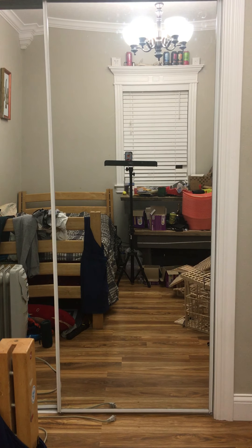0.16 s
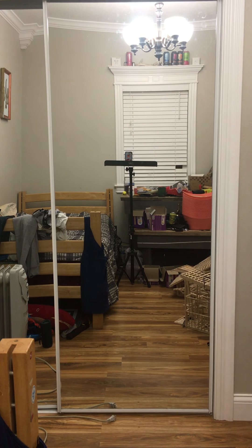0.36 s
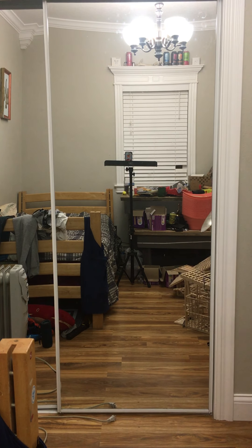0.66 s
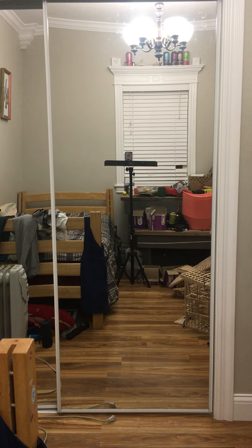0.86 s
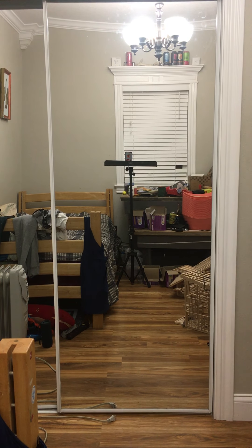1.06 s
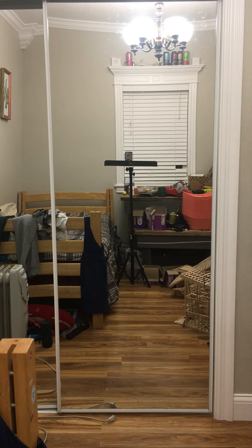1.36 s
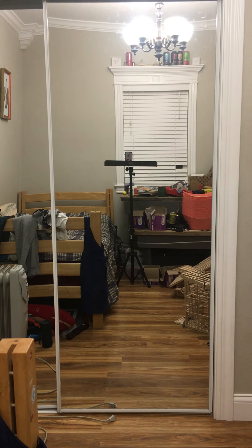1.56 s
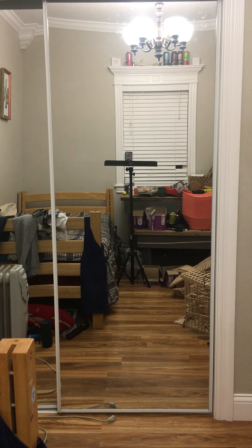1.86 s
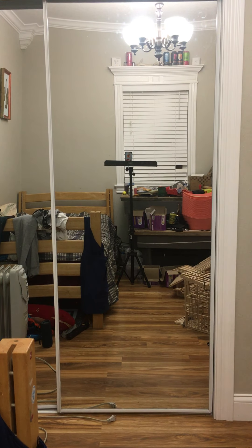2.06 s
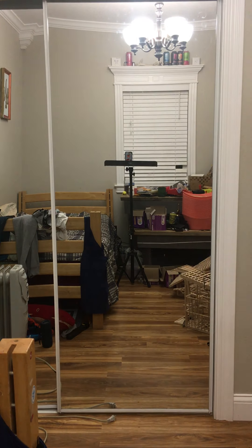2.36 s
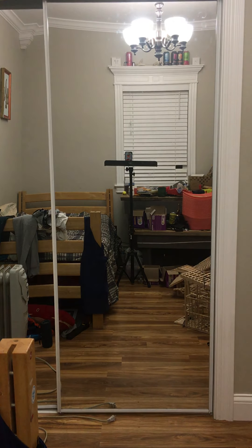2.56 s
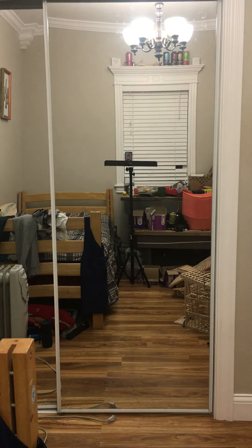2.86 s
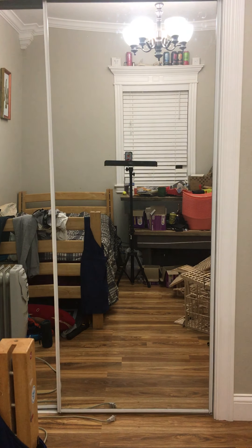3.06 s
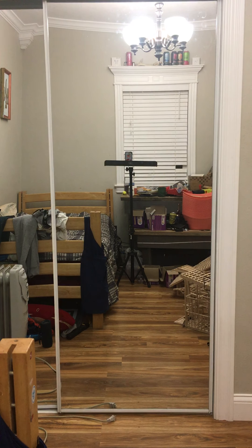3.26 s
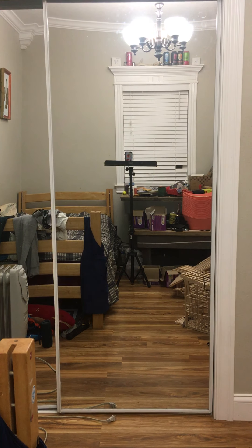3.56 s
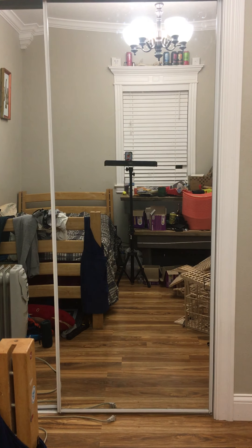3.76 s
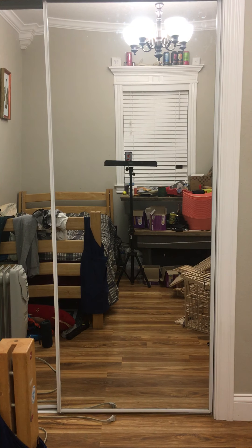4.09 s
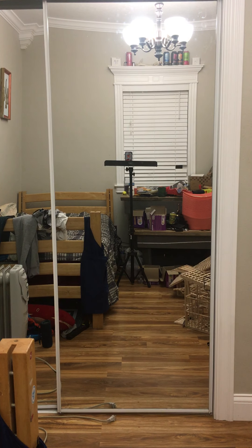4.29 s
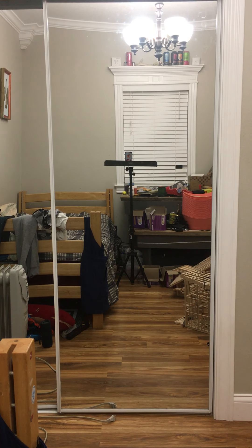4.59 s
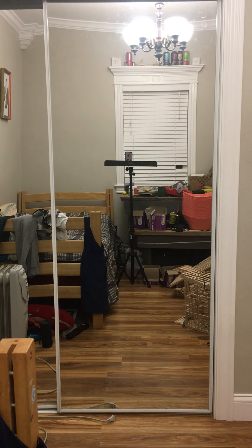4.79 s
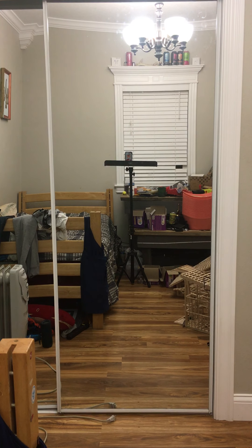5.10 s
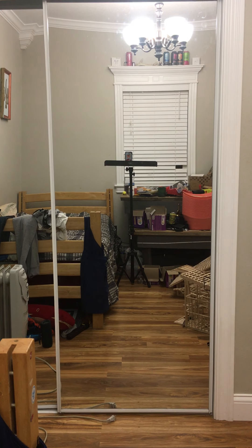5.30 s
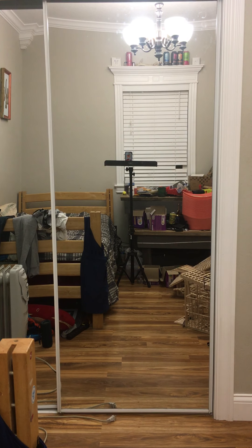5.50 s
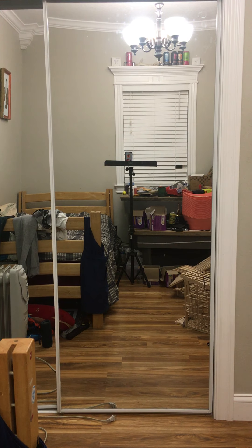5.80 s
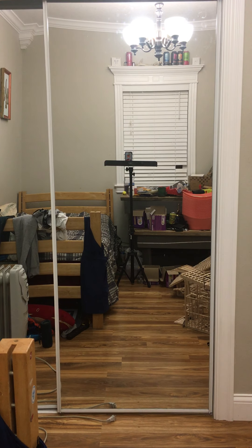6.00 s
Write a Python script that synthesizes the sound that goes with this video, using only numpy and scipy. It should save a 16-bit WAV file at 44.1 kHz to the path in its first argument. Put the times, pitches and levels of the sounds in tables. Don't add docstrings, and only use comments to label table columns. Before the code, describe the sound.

In a small, quiet bedroom with a hardwood floor, someone out of sight shuffles about, with hard knocks, dull footfalls and cloth rustle. Movement thins out over a faint low hum, broken by one sharp clack. Later a sharp knock precedes a very loud, heavy thump that shakes the boards and rocks to rest. Near silence follows. A phone on a tripod picks up the floor vibrations and slight hiss.

```python
import sys
import numpy as np
from scipy import signal
from scipy.fft import rfft, irfft, next_fast_len
from scipy.io import wavfile

SR = 44100
rng = np.random.default_rng(int(sys.argv[2]) if len(sys.argv) > 2 else 0)


def waveform_to_disk(signal):
    frames = np.transpose(np.atleast_2d(signal))
    scaled = np.clip(frames, -1, 1) * 32767
    samples = np.round(scaled).astype(np.int16)
    wavfile.write(sys.argv[1], SR, samples)


def invert_db(level):
    return 10 ** (np.asarray(level, dtype=float) / 20)


N = 270855
T = np.arange(N) / SR
SIZE = next_fast_len(N)

# pitch in Hz, level in dB, time to fade by 60 dB in seconds.
BOARDS = [(89.8, -0.5, 0.11), (104.1, 4.5, 0.31), (121, 4, 0.61), (151.2, 3.5, 0.27), (168.6, 2, 0.49),
          (188, 3.5, 0.43), (211, 1, 0.24), (239, -6, 0.23), (262.3, -6, 0.41), (296, 1.5, 0.42),
          (310, 0.5, 0.34), (357, -0.5, 0.049), (420, 1, 0.19), (498, -1, 0.079), (546, -0.5, .2),
          (673, -2.5, 0.6)]
# pitch in Hz, width in Hz, level in dB.
JOISTS = [(33, 3, -3), (47.8, 5.5, 6), (61, 5.2, -8.5)]
# start in seconds, level in dB, favoured pitch in Hz.
FOOTFALLS = [(0.016, -37, 320), (.06, -40, 300), (0.386, -47, 129), (.546, -34.5, 316), (.632, -36, 310),
             (0.665, -40, 310), (.792, -48, 280), (.906, -39, 118), (0.958, -65, 113), (1.262, -43.5, 106),
             (1.33, -53.5, 89.4), (1.565, -50.5, 186), (1.637, -57, 105), (1.748, -56, 180),
             (2.3, -55, 126), (2.388, -52, 114), (2.679, -59, 175), (2.75, -47, 200), (2.838, -54, 133),
             (4.654, -55, 147), (4.798, -57, 99.3), (5.124, -55.5, 192), (5.27, -60, 110.5)]
# start in seconds, level in dB, favoured pitch in Hz, ring factor.
LOAD_DROP = [
    (3.484, -21, 94.2, 0.66),
    (3.506, -17, 174, 0.6),
    (3.549, -30, 157, 0.61),
    (3.628, -29, 88, 0.5),
    (3.679, -26.5, 190, 0.8),
    (3.778, -27.5, 121, 1),
    (3.858, -40, 124.4, .7),
    (3.993, -43, 177, 0.93),
    (4.079, -45, 176.3, 0.76),
    (4.189, -50.5, 91.5, 0.95),
]
# start in seconds, level in dB, favoured pitch in Hz, spread in octaves, ring factor.
SINGLE_TONES = [(.5, -47, 298, 0.083, .8), (.902, -46.5, 560, .12, 0.83), (1.25, -48, 300, 0.2, .8),
                (1.335, -53.5, 420, 0.36, .7), (2.238, -39.5, 175, 0.15, .75), (2.24, -47, 535, .09, .8),
                (2.75, -54, 500, .3, 1.2), (3.164, -40, 200, .4, .5), (3.177, -34, 190, 0.072, .9),
                (3.177, -32, 410, 0.091, 1.3), (3.178, -34, 500, .15, 1.2), (3.19, -34, 314, .09, .5),
                (3.18, -38.5, 107, .15, .8), (3.181, -32, 239, .09, 1.2), (3.206, -37, 270, 0.27, .55),
                (3.498, -19, 176.3, .1, .5), (3.68, -38, 380, .35, 1.), (3.775, -40.5, 300, 0.37, 1.),
                (5.26, -53.5, 238, 0.13, .8)]
# time of greatest load in seconds, level in dB.
WEIGHT_SHIFTS = [(0, -45), (.2, -51), (.6, -46.5), (.72, -42.5), (.98, -51.5), (1.2, -50), (1.36, -48.5),
                 (1.66, -53.5), (1.77, -58), (2.05, -63), (2.45, -58.5), (2.7, -48.5), (2.84, -61),
                 (3.21, -44.5), (3.33, -44.5), (3.54, -40), (3.63, -42), (3.72, -44), (3.91, -50),
                 (4.04, -51), (4.19, -54), (4.4, -66), (4.67, -57), (5.03, -75.5), (5.27, -74), (5.92, -79)]
# time of greatest load in seconds, level in dB.
BOARD_CREEPS = [(0, -53), (.1, -43.5), (.27, -54), (.65, -40.5), (.94, -52), (1.11, -60), (1.39, -58.5),
                (1.66, -74), (1.9, -67), (2.05, -56), (2.3, -49), (2.44, -54), (2.7, -52.5), (2.82, -47),
                (3.16, -49), (3.27, -42), (3.45, -49.5), (3.69, -33.5), (3.98, -50.5), (4.19, -65),
                (4.39, -60.5), (4.7, -64), (4.9, -63.5), (5.27, -56.5), (5.55, -70), (5.92, -74.5)]
# time in seconds, pitch in Hz, level in dB.
FLOOR_SWAY = [
    (3.47, 42, -50),
    (3.53, 47, -25),
    (3.575, 46, -27.5),
    (3.6, 42, -33),
    (3.65, 52, -27.5),
    (3.685, 45, -35),
    (3.72, 44, -31.5),
    (4.03, 38, -42.5),
    (4.16, 34, -58),
]
# pitch ratio, level in dB.
SWAY_PARTNERS = [(.68, -6), (1.45, -11)]
# start in seconds, pitch in Hz, level in dB, 60 dB fade in seconds.
PANELS = [(3.55, 86, -32, .35), (3.94, 80, -50, 1.2), (4.09, 112, -52, .5), (3.57, 230, -40, .3),
          (3.7, 170, -34, .3), (4.17, 48, -50, .4), (3.57, 108, -31, .3), (3.81, 120, -42, .3),
          (3.92, 164, -45, .5), (4.075, 180, -46, .3), (3.48, 265, -32, .3), (3.485, 345, -34, .2),
          (3.18, 463, -38, .2), (3.178, 570, -40, .12), (3.19, 240, -36, .2), (3.175, 716, -42, .08),
          (3.275, 450, -48, .1), (3.193, 2650, -38, .05), (3.177, 3700, -36, .06), (3.185, 4400, -42, .2),
          (3.176, 6050, -44, .25), (.53, 1200, -46, .15), (.525, 900, -47, .15), (.59, 205, -46, .2),
          (.787, 305, -43, .22), (.555, 1350, -42, .06), (.63, 2650, -46, .15), (.61, 1850, -46, .05),
          (.02, 1050, -46, .2), (.09, 305, -45, .2), (.11, 190, -46, .15), (.2, 400, -56, .2),
          (.06, 55, -46, .4), (.26, 45, -54, .5), (.82, 170, -55, .3), (2.52, 180, -60, .3),
          (2.88, 165, -58, .3), (2.93, 282, -64, .5), (3.0, 195, -65, .5), (5.1, 420, -70, .4),
          (5.4, 280, -72, 1.), (.92, 600, -58, .25), (.9, 440, -55, .15), (.96, 100, -47, .3),
          (1.232, 1220, -58, .1), (1.236, 915, -58, .25), (1.236, 2020, -60, .08), (1.245, 2870, -62, .2),
          (1.25, 231, -56, .3), (1.322, 1200, -60, .08), (1.326, 964, -61, .15), (1.34, 800, -64, .25),
          (1.335, 463, -60, .3), (1.36, 1319, -66, .2)]
# start in seconds, length in seconds, pitch in Hz, level in dB.
SQUEAKS = [
    (1.1, .03, 2590, -70),
    (1.135, .07, 2600, -76),
    (1.135, .07, 2440, -74),
    (1.06, .04, 1260, -72),
    (1.18, .05, 1250, -71),
]
# start in seconds, clack level in dB, then wood, knock and snap in dB relative to it.
KNOCKS = [(0, -37.5, -7, -5.5, -4.5), (.007, -29, -2.5, -4, -4.5), (.5185, -37.5, -5, 4, 1),
          (.523, -34.5, -1, 6, -3), (.561, -33.5, 3.5, 2, .5), (.694, -40.5, 5, 2.5, 1),
          (1.232, -55.5, 12, 7, 6), (1.243, -54.5, -11, 6, -13), (2.2316, -35, -4, .5, 1.5),
          (2.2328, -38, -4, -6, 1), (3.1728, -28.5, 3, -18, -5.5), (3.1765, -24, -6, -9.5, -12),
          (3.476, -16.5, 0, -5.5, -8.5), (3.4805, -23.5, -1.5, -9, -11.5), (3.4845, -25, -13, -26, -11.5),
          (3.676, -38.5, -2, 0, -3)]
# start in seconds, then clack, wood, knock, snap in dB.
TOUCHES = [
    (3.141, -61.5, 1, 0, -2),
    (3.4565, -41.5, -4, 1, -7.5),
    (3.465, -42, -10, -6, 2),
    (3.4682, -40, -11, 0, 3.5),
    (3.4705, -33, -8, -3, 0),
    (3.4725, -23.5, -7, -2.5, 0.5),
]
# start in seconds, then clack, wood, knock and snap in dB.
SCUFFS = [(.2294, -61, 11.5, 4.5, 4.5), (.2464, -74, 2, -12, 0), (.4334, -64, 3, 2, 8),
          (.49, -58, 10, 15, 5), (.5267, -35.5, 4, -6, -4), (.585, -39, 4, 2, -6), (.6005, -36, 3, 2, -6),
          (.635, -40, 5, 2, -5), (.7494, -48.5, 9, -2, -9), (.8594, -52, -11, -15, -3.5),
          (.8894, -53.5, 2, -6, -9), (.9674, -72, -10, 13, 12), (1.3294, -64, 7, 11, -18),
          (1.5794, -68.5, -9, -13, 16), (1.615, -63, -12, 3, -8), (1.655, -63, -15, 0, -8),
          (1.69, -56.5, -14, 1, -4), (1.745, -63, -10, 2, -8), (1.812, -63, 2, 5, -6),
          (1.9265, -56.5, 3, 0, -12), (2.081, -67.5, 7, 11.5, 0), (2.1854, -49.5, -24, -17, -15),
          (2.388, -54, 5.5, 2.5, -2), (2.6434, -60.5, -19, 2, -2.5), (2.705, -53, -38, 1.5, -1),
          (2.882, -53.5, 3, -10.5, -8.5)]
# start in seconds, pitch in Hz, level in dB.
CRACKS = [(.007, 2460, -27), (.5185, 14800, -34.5), (.968, 11000, -45), (2.2316, 7400, -22.5),
          (2.232, 12100, -25), (2.233, 5530, -25.5), (2.234, 1860, -30), (2.2328, 1110, -31.5),
          (3.479, 2400, -18.5), (3.173, 9150, -25.5), (3.1734, 4020, -26.5), (3.4688, 7300, -23),
          (3.4809, 3480, -15.5), (3.4843, 4600, -14)]
# start in seconds, pitch in Hz, level in dB, 60 dB fade in seconds.
RINGING_PARTS = [(.012, 6440, -40.5, 0.24), (0.009, 7300, -38, 0.22), (.526, 2950, -32.5, 0.07),
                 (0.524, 6530, -40.5, 0.23), (0.55, 1420, -44, 0.23), (.552, 2656, -45.5, 0.56),
                 (0.56, 9940, -36.5, 0.33), (.562, 15600, -45, .25), (3.5, 2500, -34, .12),
                 (.925, 1350, -58, .12), (1.24, 736, -53.5, 0.32), (1.335, 1100, -57, 0.13),
                 (2.2367, 211, -41.5, 0.22), (3.19, 8600, -53, .4), (2.499, 296, -49, .24),
                 (3.175, 2840, -36.5, 0.19), (3.473, 2432, -27.5, 0.15), (3.477, 3010, -21, 0.072),
                 (3.4748, 403, -28.5, 0.12), (3.479, 1930, -27, 0.11), (3.993, 178.4, -40, 0.24)]
# start in seconds, pitch in Hz, level in dB, 60 dB fade in seconds.
RASPS = [
    (.75, 2700, -52, 0.12),
    (.8, 2930, -56, 0.13),
    (1.612, 2010, -64.5, 0.64),
    (1.701, 2210, -77, 0.22),
    (1.921, 1496, -54.5, .19),
    (3.676, 2357, -44, 0.15),
    (4.12, 2500, -77, 0.7),
    (.7, 10500, -46.5, 0.31),
    (2.24, 5260, -42, 0.33),
    (4.699, 2684, -79, 1),
]
# start in seconds, length in seconds, level in dB, treble in dB, low in dB.
SWISHES = [(.14, 0.15, -77.5, 10, 19), (0.316, 0.17, -66, -8, 0), (0.425, 0.085, -56.5, -4, 9.5),
           (0.547, .05, -67, 26, 13), (0.67, 0.084, -65, 14, 17), (0.756, 0.13, -65.5, 5, -10),
           (0.862, 0.052, -59.5, 9.5, -11), (0.954, 0.28, -70, 2.5, 4.5), (1.298, 0.035, -71, -12, 21.5),
           (1.326, 0.28, -69, -4, -0.5), (1.54, 0.3, -61, -3.5, -6), (1.889, 0.052, -58, -18, -1),
           (2.106, 0.12, -65.5, 0, 4), (2.418, 0.22, -62, -12, -3.5), (2.656, .14, -59.5, 1.5, -1.5),
           (2.783, .1, -64, -10, -25), (3.053, .12, -82, -10, -7), (3.776, 0.43, -84, 13.5, -10),
           (4.02, .5, -76, -12, 6), (4.98, .1, -83, -10, 7.5), (5.1, 0.26, -85, -7, 21.5)]
# pitches in Hz of low end, wood, knock, clack, snap and top end.
COLOUR_HZ = (200, 650, 1600, 3500, 9000, 16000)
BANDS_HZ = 250 * 2 ** np.arange(0, 6.1, .5)
# pitch in Hz, 60 dB fade in seconds.
ROOM_FADE = [(200, 0.19), (500, 0.43), (1200, 0.41), (2600, 0.38), (5500, 0.38), (10000, 0.38),
             (14500, 0.22)]
# time in seconds, level in dB.
HUM_LEVEL = [
    (0, -71),
    (1.3, -66.5),
    (2.5, -62.5),
    (2.7, -78),
    (6.14, -80.5),
]
# pitch in Hz, level in dB per Hz.
HISS_SPECTRUM = [(12, -47), (20, -14.5), (55, -1), (81, -16.5), (200, -20), (652, -27.5), (750, -29.5),
                 (1240, -30), (1390, -31.5), (1840, -35.5), (2810, -33.5), (4930, -36), (13500, -32.5),
                 (15200, -33), (16500, -52)]
# pitch in Hz, width in Hz, level in dB.
MIC_PORT = [(2610, 320, 1.5), (4830, 400, -2.5), (10520, 320, -3.5), (7900, 460, -3.5)]


def floor():
    steps = [(s, db, hz, 0.47 * (150 / hz) ** 0.46, 0.99) for s, db, hz in FOOTFALLS]
    drop = [(s, db, hz, 0.55, ring) for s, db, hz, ring in LOAD_DROP]
    return thuds(steps + drop) + thuds(SINGLE_TONES) + weight()


def thuds(table):
    hz, db, t60 = np.transpose(BOARDS)[:, :, None]
    chance = rng.standard_normal((len(table), 3, len(BOARDS), 1))
    out, t = np.zeros(N), T[:SR // 3]
    push = 1 - np.exp(-t / 0.003)
    ending = np.cos(np.pi / 2 * t / t[-1])
    for (s, level_db, pitch_hz, spread_oct, ring), (detune, size, turn) in zip(table, chance):
        distance = np.log2(hz / pitch_hz) / spread_oct
        share = invert_db(db + 2 * size) * np.exp(-.5 * distance ** 2)
        fade = np.exp(-np.log(1000) * t / (t60 * ring))
        tone = np.sin(2 * np.pi * hz * (1 + 0.019 * detune) * t + .8 * turn)
        modes = share * fade * push * ending * tone
        add(out, s, invert_db(level_db) * modes.sum(axis=0) / np.sqrt((share ** 2).sum()))
    return out


def weight():
    def joist_gain(f):
        return sum(invert_db(db) / np.hypot(1, 2 * (f - hz) / width) ** 0.94 for hz, width, db in JOISTS)

    def board_gain(f):
        return sum(invert_db(db) / np.hypot(1, (f - hz) * t60 / 1.9) * (120 / hz) ** 1.5 for hz, db, t60 in BOARDS)

    shake = loading(WEIGHT_SHIFTS, rise_db_s=200, fall_db_s=108.5, rest_db=-74.5) * coloured(joist_gain)
    creep = loading(BOARD_CREEPS, rise_db_s=157.5, fall_db_s=108.5, rest_db=-68) * coloured(board_gain)
    return shake + invert_db(-4.5) * creep


def loading(table, rise_db_s, fall_db_s, rest_db):
    power = invert_db(rest_db) ** 2
    for s, db in table:
        power = power + invert_db(db - np.maximum(rise_db_s * (s - T), fall_db_s * (T - s))) ** 2
    return np.sqrt(power)


def sway():
    inside = (T > FLOOR_SWAY[0][0]) & (T < FLOOR_SWAY[-1][0])
    phase = 2 * np.pi * np.cumsum(inside * curve(FLOOR_SWAY, column=1)) / SR
    modes = np.sin(phase) + sum(invert_db(db) * np.sin(ratio * phase) for ratio, db in SWAY_PARTNERS)
    return inside * invert_db(curve(FLOOR_SWAY, column=2)) * modes


def panels():
    out = np.zeros(N)
    for s, hz, db, t60 in PANELS:
        t = T[:int(t60 * SR)]
        size = (1 - np.exp(-t * hz / .6)) * np.exp(-np.log(1000) * t / t60)
        add(out, s, invert_db(db) * size * np.sin(2 * np.pi * hz * t))
    for s, length, hz, db in SQUEAKS:
        t = T[:int(length * SR)]
        add(out, s, invert_db(db) * np.sin(np.pi * t / length) * np.sin(2 * np.pi * hz * t))
    return out


def struck():
    cracks = [(s, hz, db, 0.0048 * (5000 / hz) ** .5, 50.64) for s, hz, db in CRACKS]
    parts = [(s, hz, db, t60, 85.5 * (hz / 1006) ** .5) for s, hz, db, t60 in RINGING_PARTS]
    rasps = [(*row, 578) for row in RASPS]
    return rings(cracks + parts + rasps)


def rings(table):
    out = np.zeros(N)
    for s, hz, db, t60, waver_hz in table:
        t = T[:int(min(t60, .4) * SR)]
        steps = rng.standard_normal((2, 512))
        wander = [np.interp(t * waver_hz * 2, np.arange(512), row) for row in steps]
        size = np.exp(-t / .006) + (1 - np.exp(-t / 0.0095)) * (wander[0] + 1j * wander[1])
        fade = np.exp(-np.log(1000) * t / t60) * np.cos(np.pi / 2 * t / t[-1])
        add(out, s, invert_db(db) * fade * np.imag(size * np.exp(2j * np.pi * hz * t)))
    return out


def contacts(table, length, rise):
    out, t = np.zeros((N, len(BANDS_HZ))), T[:SR // 16]
    shape = (1 - np.exp(-t / (rise * length))) * np.exp(-t / length)
    for s, db, wood_db, knock_db, snap_db in table:
        add(out, s, (invert_db(db) * shape[:, None]) ** 2 * colour(wood_db, knock_db, snap_db))
    return out.T


def rustle():
    out = np.zeros((N, len(BANDS_HZ)))
    for s, length, db, treble_db, low_db in SWISHES:
        swell = np.sin(np.pi * T[:int(length * SR)] / length)
        add(out, s, (invert_db(db - 13) * swell[:, None]) ** 2 * colour(low_db, 0.082 * low_db, treble_db))
    return out.T


def colour(wood_db, knock_db, snap_db):
    marks_db = [wood_db + 13.5 - 3.5, wood_db + 5, knock_db + 5, 0, snap_db - 0.5, snap_db - 5 - 4.5]
    return 8 * invert_db(np.interp(np.log(BANDS_HZ), np.log(COLOUR_HZ), marks_db)) ** 2


def airborne(power):
    grains = grit(1.7, hold=24)
    grains, out = grains / grains.std(), 0
    hz, t60 = np.transpose(ROOM_FADE)
    for f, p in zip(BANDS_HZ, power):
        room = store(p, np.interp(np.log(f), np.log(hz), t60))
        hallway = invert_db(-28) ** 2 * store(p, t60=1.0)
        built = store(room + hallway, t60=0.01)
        echoes = grit(1.2, hold=int(6 * SR / f) + 40)
        field = invert_db(4.5) * np.sqrt(np.abs(built)) * echoes / echoes.std()
        out = out + band(np.sqrt(p) * grains + field, f)
    return out


def store(power, t60):
    keep = np.exp(-2 * np.log(1000) / (t60 * SR))
    return signal.lfilter([1 - keep], [1, -keep], power)


def grit(scatter_db, hold):
    size = invert_db(scatter_db * rng.exponential(size=N // hold + 1))
    return rng.standard_normal(N) * np.repeat(size, hold)[:N]


def band(x, hz):
    edges = [hz / 2 ** .25, min(hz * 2 ** .25, .45 * SR)]
    return signal.sosfilt(signal.butter(2, edges, "band", fs=SR, output="sos"), x)


def hum():
    return invert_db(curve(HUM_LEVEL, column=1)) * np.sqrt(2) * np.sin(2 * np.pi * 118.4 * T)


def hiss():
    hz, db = np.transpose(HISS_SPECTRUM)
    return invert_db(-67.5) * coloured(lambda f: invert_db(np.interp(np.log(f), np.log(hz), db)))


def coloured(gain):
    f = np.arange(1, SIZE // 2 + 2) * SR / SIZE
    y = irfft(rfft(rng.standard_normal(SIZE)) * gain(f), SIZE)[:N]
    return y / y.std()


def curve(table, column):
    rows = np.array(table, float)
    return np.interp(T, rows[:, 0], rows[:, column])


def add(out, s, x):
    i = int(s * SR)
    out[i:i + len(x)] += x[:len(out) - i]


def scene():
    knocks = contacts(KNOCKS, length=0.0015, rise=.15)
    touches = contacts(TOUCHES, length=0.0033, rise=0.074)
    scuffs = invert_db(-1.5) * contacts(SCUFFS, length=0.0041, rise=0.35)
    air = airborne(knocks + touches + scuffs + rustle())
    return (floor() + sway() + panels() + struck() + air + hum() + hiss())[None]


def roll_off(x):
    return signal.sosfilt(signal.butter(12, 16640, fs=SR, output="sos"), x)


def record(dry):
    f = np.arange(SIZE // 2 + 1) * SR / SIZE
    port = invert_db(sum(db * np.exp(-.5 * ((f - hz) / width) ** 2) for hz, width, db in MIC_PORT))
    port = port / np.hypot(1, (f / 15870) ** 250)
    mix = irfft(rfft(dry, SIZE) * port, SIZE)[:, :N]
    return roll_off(mix)


dry = scene()
out = record(dry)
waveform_to_disk(out)
```